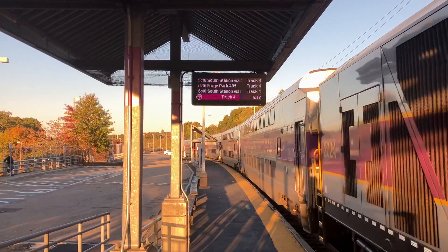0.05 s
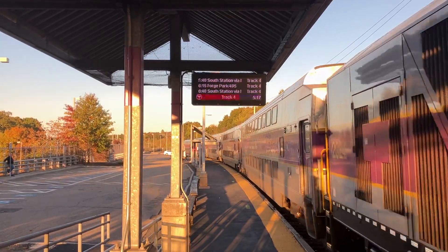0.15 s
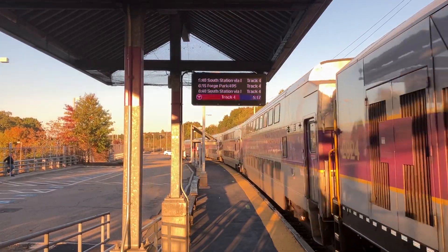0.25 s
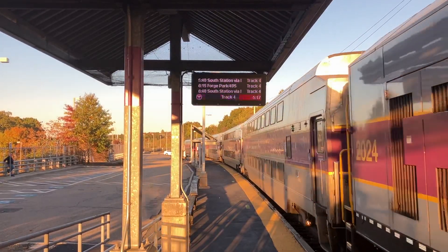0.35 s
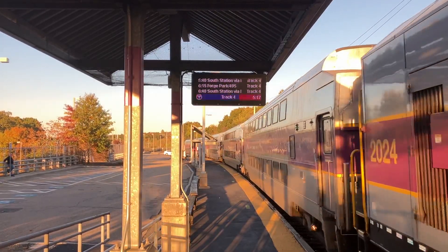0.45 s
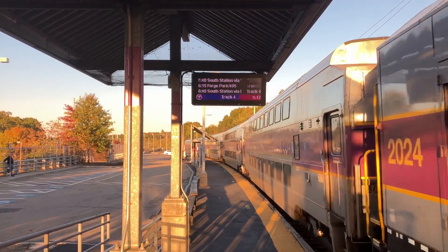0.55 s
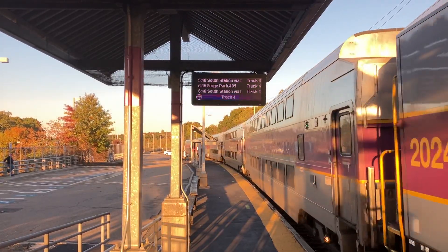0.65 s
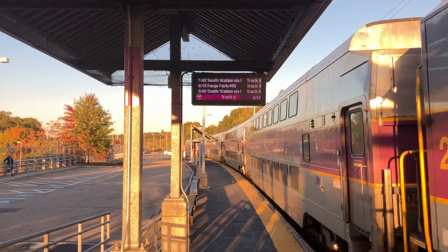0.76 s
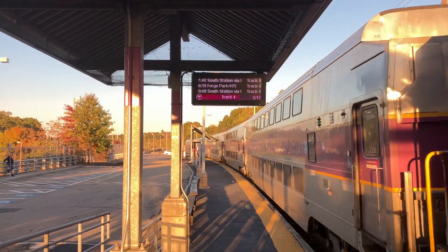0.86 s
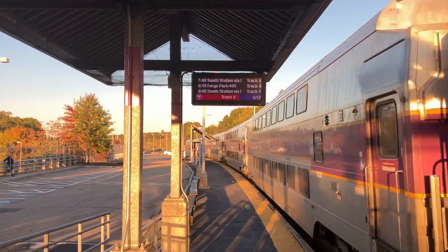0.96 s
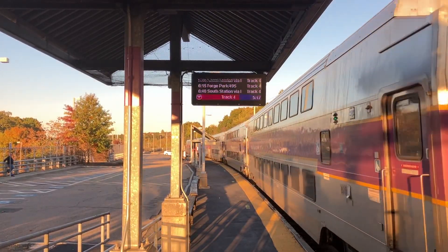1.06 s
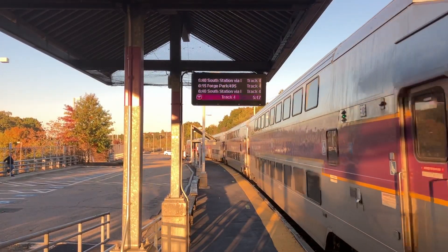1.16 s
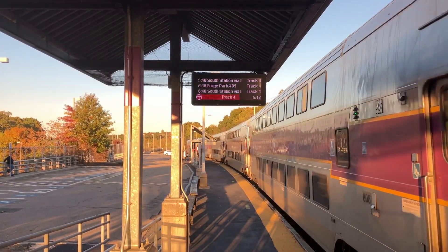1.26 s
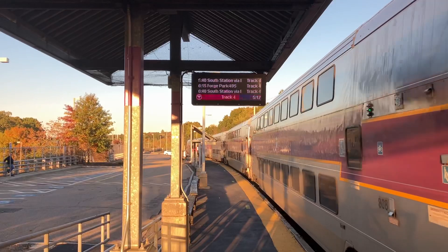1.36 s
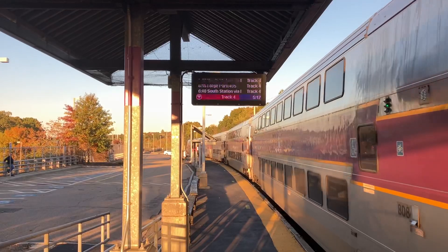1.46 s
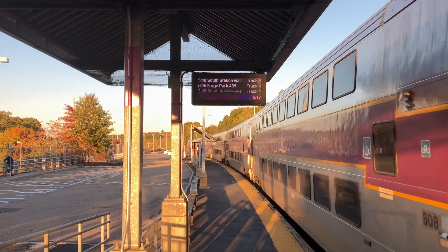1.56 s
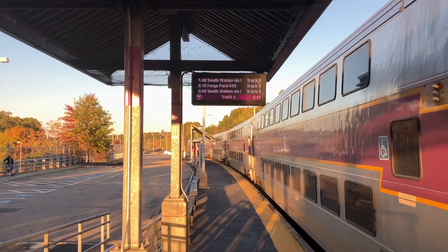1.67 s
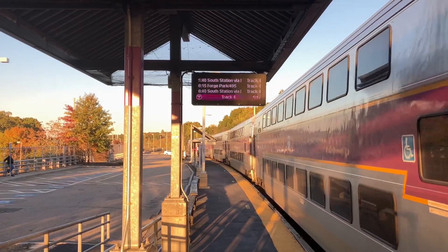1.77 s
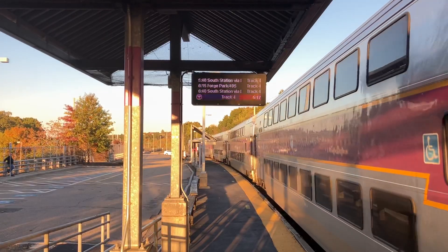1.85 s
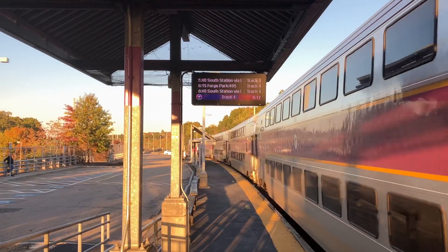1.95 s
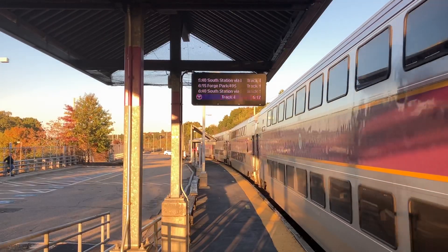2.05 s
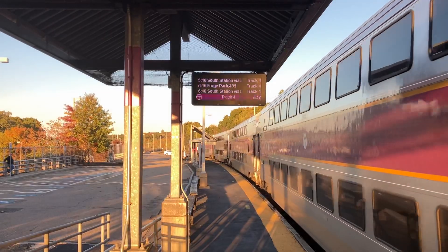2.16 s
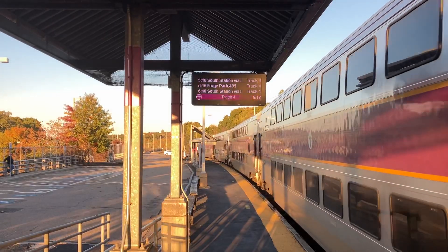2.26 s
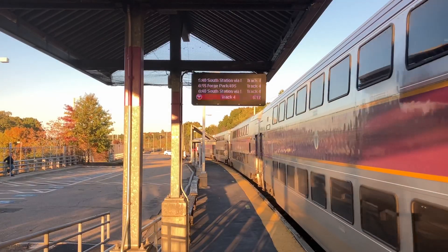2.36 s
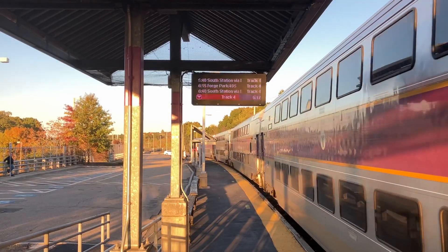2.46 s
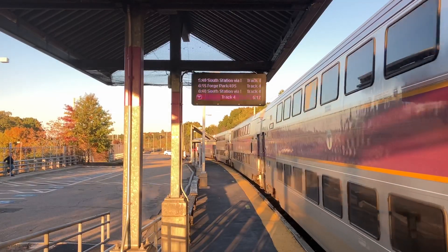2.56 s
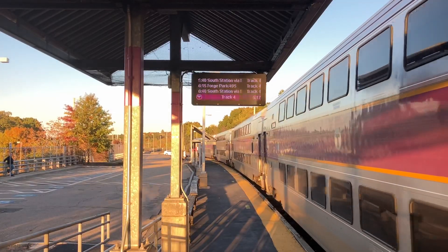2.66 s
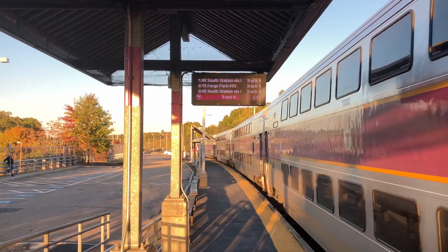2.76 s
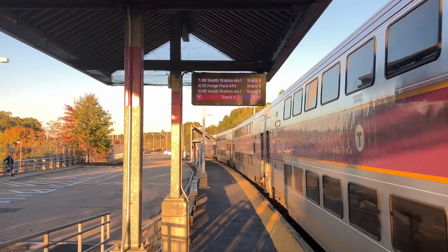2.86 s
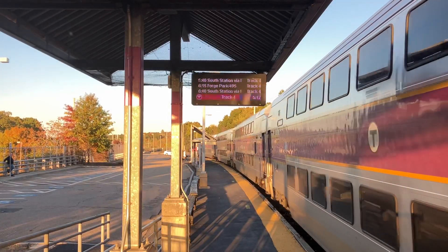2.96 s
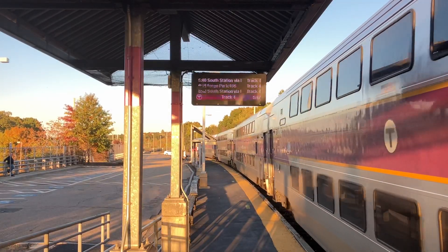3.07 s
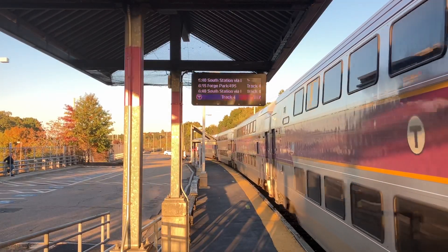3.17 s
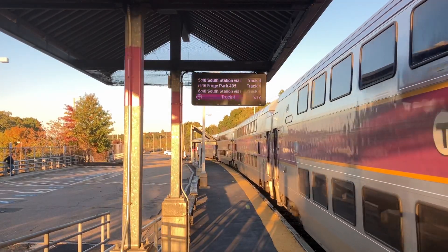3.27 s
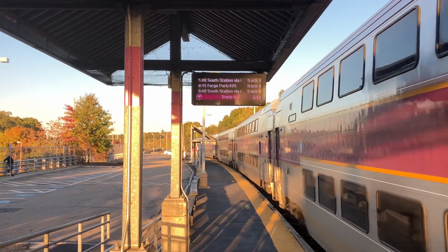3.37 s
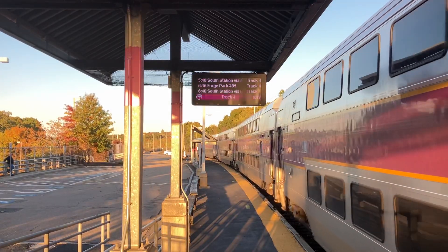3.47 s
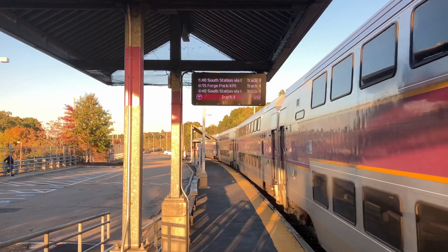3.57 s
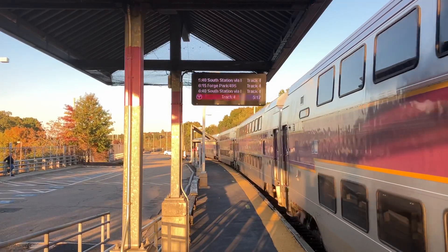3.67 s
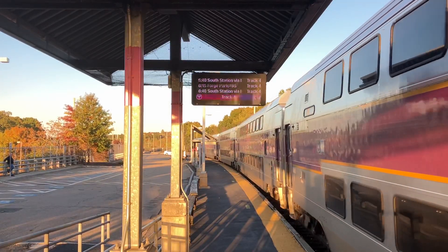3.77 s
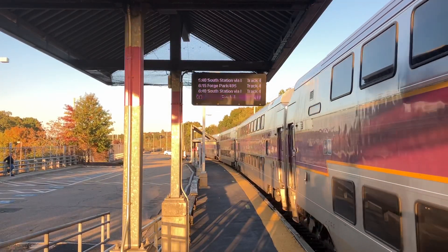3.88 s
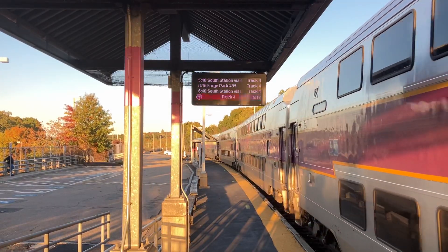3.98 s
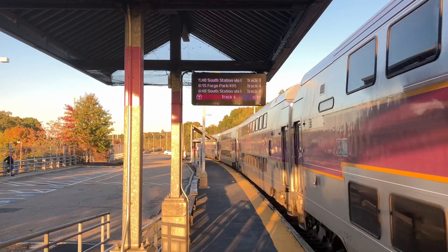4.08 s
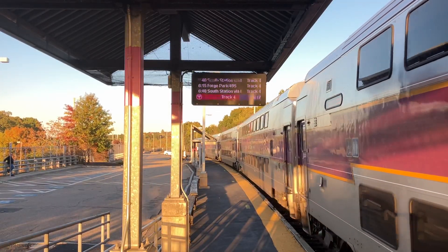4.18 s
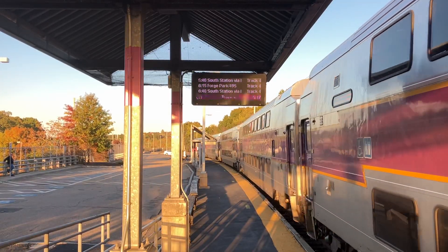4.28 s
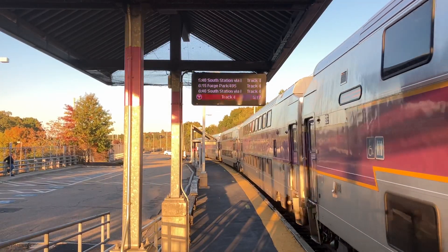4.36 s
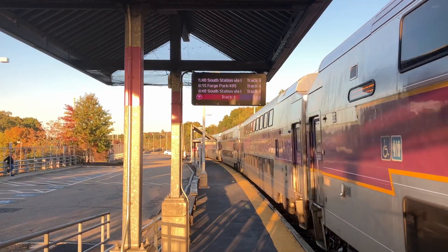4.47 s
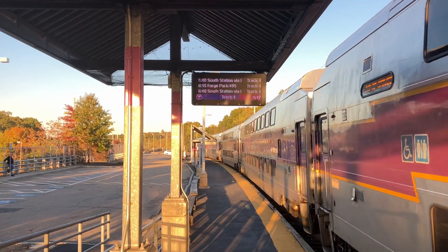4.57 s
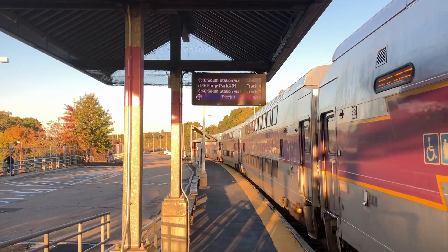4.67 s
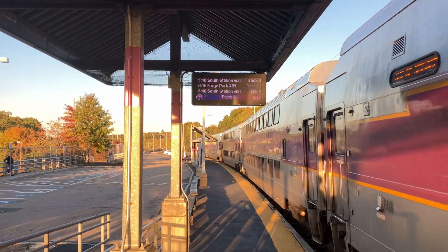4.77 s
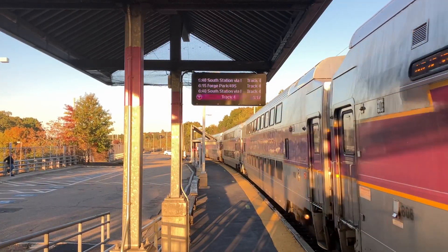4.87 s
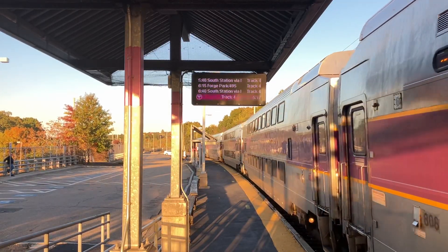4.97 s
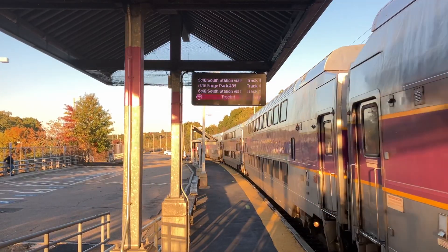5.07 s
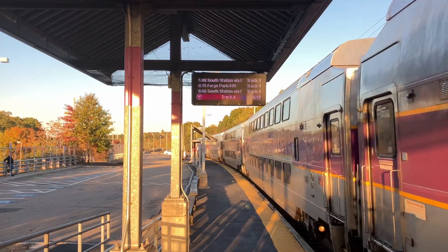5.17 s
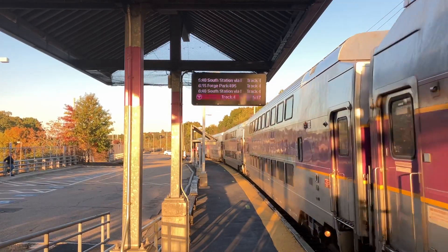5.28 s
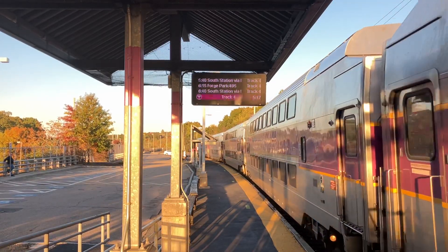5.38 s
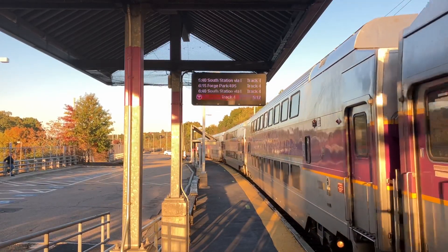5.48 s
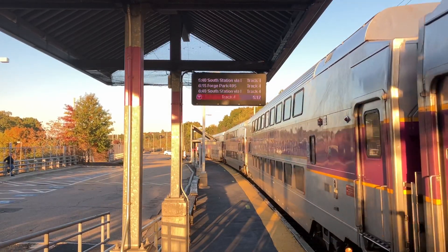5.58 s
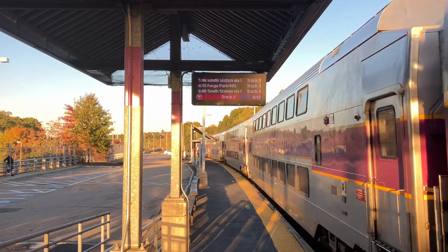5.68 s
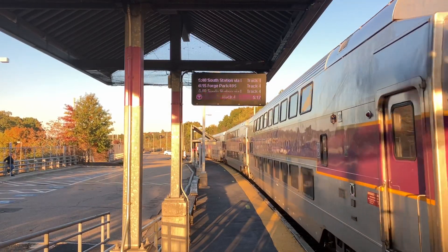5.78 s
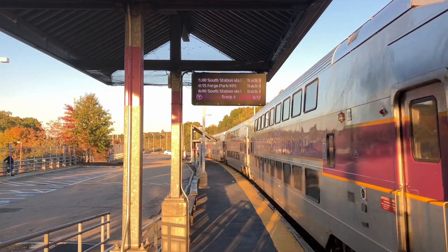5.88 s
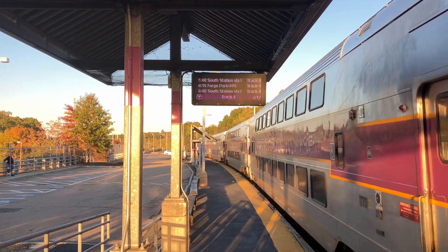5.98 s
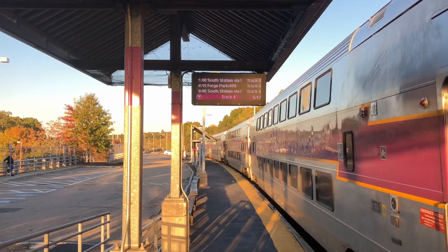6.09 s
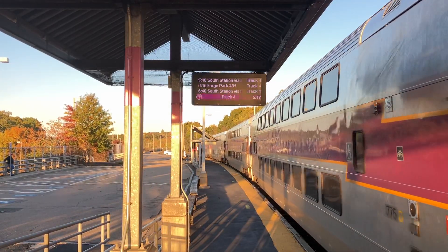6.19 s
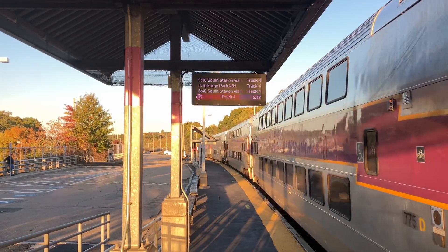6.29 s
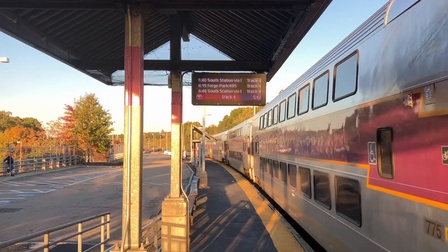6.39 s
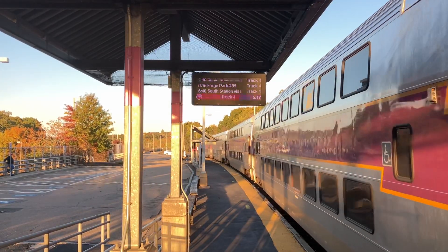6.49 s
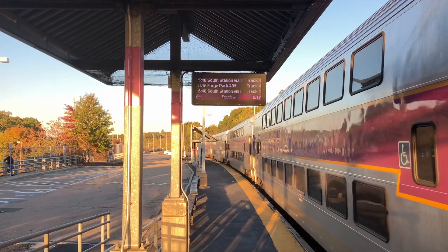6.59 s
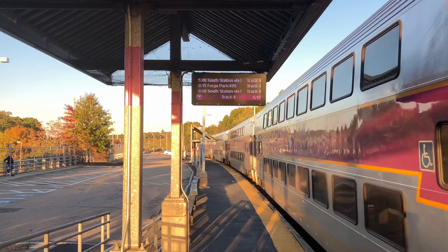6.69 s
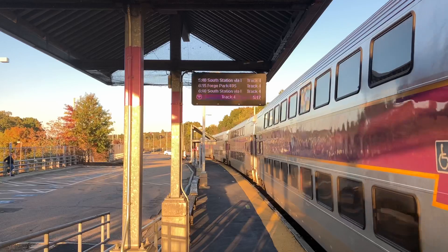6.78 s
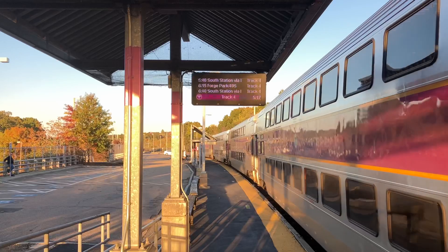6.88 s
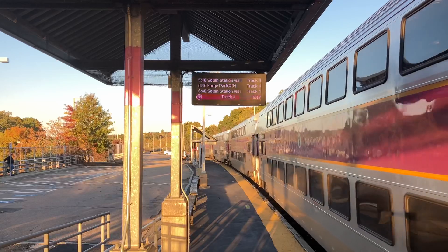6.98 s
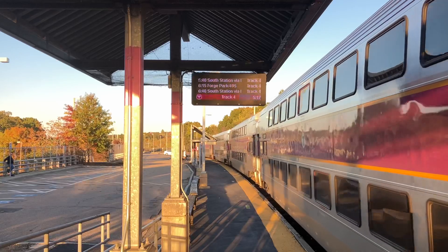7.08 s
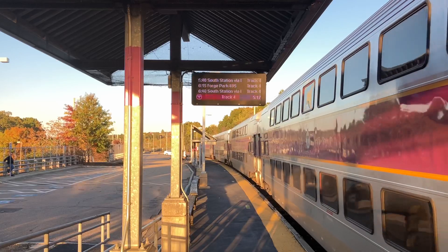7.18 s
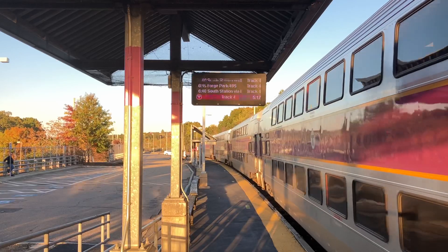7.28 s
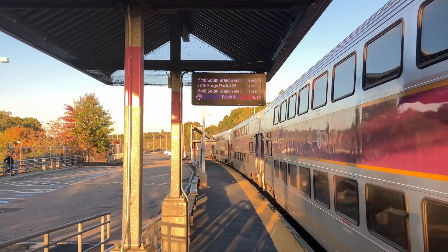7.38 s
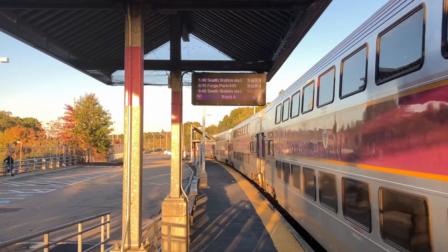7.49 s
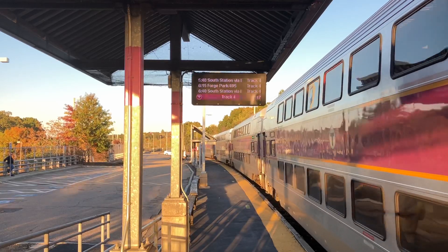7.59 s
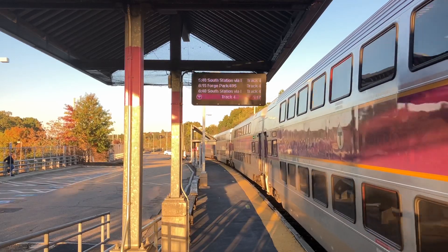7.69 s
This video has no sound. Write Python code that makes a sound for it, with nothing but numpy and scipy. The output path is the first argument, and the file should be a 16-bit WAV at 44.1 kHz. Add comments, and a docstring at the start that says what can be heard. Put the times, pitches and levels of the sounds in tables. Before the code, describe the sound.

Outdoors under a station canopy, a diesel locomotive passes very close on the right: deep beating exhaust, roaring fans, rapid ticking air spits and jingling metal. It fades within about two seconds as the throttle eases. Coaches follow slowly with low rumble, wheel hiss, faint chirps and short metallic rings. Air leaks thinly, puffs once late, and brakes begin to sing at the end. Fixed stereo microphones on the platform.

```python
"""Station platform, two microphones: a diesel locomotive passes close on the right and draws away. Beating
crank orders make its exhaust throb; blurred blade-pass tones are its fans, pulsed noise its spitting valve.
Coaches roll slowly after it: coloured noise rumbles and hisses, frayed notes are flanges chirping on the
curved rail and brakes ringing, and compressed air leaks and lets off one short puff."""
import sys
import numpy as np
from scipy import signal
from scipy.fft import rfft, irfft
from scipy.io import wavfile
from scipy.ndimage import uniform_filter1d, minimum_filter1d

SR = 44100
rng = np.random.default_rng(int(sys.argv[2]) if len(sys.argv) > 2 else 0)


def store_pcm(level_fs):
    """Save levels as 16-bit WAV."""
    pcm = np.round(np.clip(level_fs, -1, 1) * 32767).astype(np.int16)
    wavfile.write(sys.argv[1], SR, np.atleast_2d(pcm).T)


N = 341334
TIME = np.arange(N) / SR
BINS = np.fft.rfftfreq(N, 1 / SR)
SPEED_M_PER_S, SOUND_M_PER_S = 5, 343
BOOM_ORDER, BEAT_ORDER = 12, 15  # multiples of the crank rate
# one easing of the throttle: crank turns a second before and after, and when the drop starts and ends
CRANK_HZ, THROTTLE_BACK_S = (5.092, 4.758), (2.268, 4.577)

# exhaust's two strong orders, before trims: time_s, boom_level_db, beat_level_db
EXHAUST_LEVELS = [(0.05, -9, -10), (0.33, -8.5, -12), (0.39, -12, -15.5), (0.57, -14, -15),
                  (0.7, -9.5, -16), (0.87, -8.5, -40), (0.92, -9.5, -26), (0.97, -15.5, -21),
                  (1.23, -24, -23), (1.4, -13, -22), (1.8, -12, -29.5), (2.26, -19, -19),
                  (2.84, -20.5, -29.5), (3.24, -34, -21.5), (3.3, -31, -29), (3.9, -33, -28),
                  (4.55, -36.5, -39), (4.61, -32.5, -28), (5.64, -29, -32), (7.26, -44, -30.5),
                  (7.62, -24, -32)]
# uneven cylinders, relative to the growl: crank_multiple, level_db
GROWL_ORDERS = [(6, -20), (9, -25), (11, 4.5), (13, -3), (14, -8.5), (16, -2.5), (17, -9), (18, -7.5),
                (19, -1.5), (20, -14), (21, -10.5), (22, -8.5), (23, -10.5), (28, -12.5)]
GROWL_LOADED_DB, GROWL_IDLE_DB = -28, -41.5
GROWL_SWELL_S, GROWL_SWELL_HALF_S, GROWL_SWELL_DB = 6.3, 0.79, 5


def exhaust(waver=0.61, lag_s=0.00047, boom_db=1.5, beat_db=1.0):
    """Two crank orders beat into a throb; uneven cylinders add a growl that eases with the throttle."""
    turns = crank_turns()
    boom = np.cos(2 * np.pi * BOOM_ORDER * turns) * gain_of(curve(EXHAUST_LEVELS) + boom_db)
    beat = np.cos(2 * np.pi * BEAT_ORDER * turns) * gain_of(curve(EXHAUST_LEVELS, column=2) + beat_db)
    pipe = boom + beat
    growl = gain_of(np.interp(TIME, THROTTLE_BACK_S, (GROWL_LOADED_DB, GROWL_IDLE_DB)))
    # the growl swells once more, late
    swell = np.exp(-((TIME - GROWL_SWELL_S) / GROWL_SWELL_HALF_S) ** 2)
    growl = growl * gain_of(GROWL_SWELL_DB * swell)
    for order, db in GROWL_ORDERS:
        firing = np.exp(2j * np.pi * (order * turns + rng.random()))
        unsteady = np.exp(1j * waver * wander(1.9).real)
        pipe += gain_of(db) * growl * (firing * unsteady).real
    left = np.interp(TIME - lag_s, TIME, pipe) * gain_of(-2.5)
    right = pipe * gain_of(-2.23)
    return np.sqrt(2) * np.array([left, right])


def crank_turns():
    """Angle of the crankshaft, in turns."""
    return np.cumsum(np.interp(TIME, THROTTLE_BACK_S, CRANK_HZ)) / SR - .032


# likeness of the two microphones for locomotive noise: pitch_hz, likeness (0-1)
LOCO_LIKENESS = [(50, 0.92), (130, 0.95), (260, 1), (550, 0.89), (1100, 0.3), (2500, 0.47), (6000, 0.13),
                 (12000, 1)]
# noise colours, shape only: pitch_hz, level_db (per Hz)
ROAR_COLOUR = [(18, -12), (40, -7.5), (75, 9), (120, -0.5), (190, 1), (270, -6.5), (350, -4.5), (500, -6.5),
               (680, -0.5), (850, -11), (1200, -25), (2500, -55.5)]
MACHINERY_COLOUR = [(500, -1.5), (1000, -2.5), (1400, -2), (1800, -4), (2150, -18), (3000, -50),
                    (6000, -68)]
TREBLE_COLOUR = [(1200, -1), (2200, 5.5), (2900, 1.5), (3600, -2), (5000, -2), (7500, -9.5), (11000, -53),
                 (16000, -48)]
GRILLE_COLOUR = [(200, -29), (330, -1.5), (480, 4.5), (600, -1), (740, -0.5), (950, -21), (2000, -37),
                 (5000, -52)]


def locomotive(chuff=0.31):
    """Roar pulsing with the firing, a rush from the side grilles, and machinery hiss loudest side-on."""
    firing = np.cos(2 * np.pi * BOOM_ORDER * crank_turns())
    roar = noise(ROAR_COLOUR, LOCO_LIKENESS, lag_ms=0.46) * (1 + chuff * firing)
    roar *= passing(abreast_s=0.58, gap_m=3, db=-16, fall_db=30)
    whirr = noise(MACHINERY_COLOUR, LOCO_LIKENESS, lag_ms=0.36)
    whirr *= passing(abreast_s=0.5043, gap_m=3, db=-23.5, fall_db=31.5)
    treble = noise(TREBLE_COLOUR, LOCO_LIKENESS, lag_ms=0.264) * treble_passing()
    treble *= gain_of(1.7 * wander(15).real)
    grilles = noise(GRILLE_COLOUR, LOCO_LIKENESS, lag_ms=0.15)
    grilles *= passing(abreast_s=0.45, gap_m=0.7, db=-21.5, fall_db=55)
    return roar + bounced(grilles + whirr, abreast_s=.75, gap_m=3.2, delay_ms=7.5, strength=.5) + treble


def treble_passing():
    """Gain of the locomotive's treble sources as they roll by."""
    return passing(abreast_s=.5, gap_m=3.5, db=-31, fall_db=34)


def bounced(x, abreast_s, gap_m, delay_ms, strength):
    """Adds the platform's reflection; its delay is longest when abreast, so a comb sweeps the noise."""
    distance = np.hypot(gap_m, SPEED_M_PER_S * (TIME - abreast_s))
    delay_s = delay_ms / 1000 * gap_m / distance
    echo = np.array([np.interp(TIME - delay_s, TIME, side) for side in x])
    return (x + strength * echo) / np.hypot(1, strength)


# fans' lowest partial: time_s, level_db
DRONE_LEVELS = [(0, -17.5), (.12, -24), (.25, -25.5), (.45, -23), (.63, -20.5), (.9, -15.5), (1.02, -34),
                (1.2, -27.5), (1.33, -25.5), (1.5, -27), (1.68, -38), (2.0, -32), (2.25, -31), (2.5, -38.5),
                (3.4, -45)]
# second partial: time_s, level_db
SECOND_LEVELS = [(0, -40), (.1, -26.5), (.23, -21), (.3, -33), (.55, -30), (.7, -27.5), (.88, -26),
                 (.95, -45), (1.11, -29), (1.17, -43), (1.24, -22), (1.29, -44), (1.38, -27.5), (1.55, -47),
                 (2.0, -38.5), (2.28, -37.5), (2.45, -46), (4.4, -43), (5.6, -47.5), (7.7, -47)]
# third partial, coming in pulses, before its trim: time_s, level_db
THIRD_LEVELS = [(0.0, -41), (0.03, -36), (0.17, -18.5), (0.24, -22), (0.26, -41), (0.3, -26.5),
                (0.64, -25.5), (0.74, -35), (0.96, -26.5), (1.24, -25.5), (1.31, -38), (1.4, -23.5),
                (1.5, -34.5), (1.55, -26), (1.6, -49), (1.69, -22.5), (1.85, -39.5), (2.59, -41),
                (2.63, -63), (2.71, -43), (2.92, -49), (3.6, -46), (5.3, -54.5), (6.8, -48.5)]
# weaker partials, relative to one another: blade_multiple, level_db, width_hz
WEAK_PARTIALS = [(4, -16, 56), (5, -22, 34), (7, -28.5, 35)]
BLADE_HZ, FAN_ABREAST_S, FAN_GAP_M = 201.7, 0.5, 5
# the first coach screens the roof fans
SCREENED_S, SCREENED_OVERTONE_DB, DRONE_GONE_S = 2, -0.5, 4.03


def fans(waver=0.00415, third_db=-1):
    """Blade-pass tones of the cooling fans, blurred by turbulence and sinking in pitch as they pass."""
    hz = BLADE_HZ * doppler(FAN_ABREAST_S, FAN_GAP_M) * (1 + waver * wander(4.08).real)
    drone = tone(hz, 9, clean=.95, lag_ms=0.18, spread=0.2) * gain_of(curve(DRONE_LEVELS))
    drone *= eased(0.98, 0, DRONE_GONE_S, span_s=0.2)
    second = tone(2 * hz, 21, clean=0.856, lag_ms=0.22, spread=0.24) * gain_of(curve(SECOND_LEVELS))
    third = tone(3 * hz, 26, clean=0.94, lag_ms=0.06, spread=0.15)
    third *= gain_of(curve(THIRD_LEVELS) + third_db)
    weak = np.zeros((2, N))
    for multiple, db, width_hz in WEAK_PARTIALS:
        weak += gain_of(db) * tone(multiple * hz, width_hz, clean=0.92, lag_ms=0.14, spread=0.16)
    weak *= passing(FAN_ABREAST_S, FAN_GAP_M, db=-23.5, fall_db=34)
    screened = gain_of(eased(0, SCREENED_OVERTONE_DB, SCREENED_S, span_s=1.0))
    return drone + second + third + weak * screened


def clatter(db=3, t60_s=0.14, low_hz=1600, high_hz=4000, count=420):
    """Loose truck fittings jingle: small metal rings at random over 3 s, fading with the machinery."""
    t = np.arange(SR // 5) / SR
    envelope = (1 - np.exp(-t / .004)) * gain_of(-60 * t / t60_s)
    out = np.zeros((2, N + len(t)))
    for when, pitch, size, side, turn in rng.random((count, 5)):
        hz = low_hz * (high_hz / low_hz) ** pitch
        ping = np.sin(2 * np.pi * (hz * t + np.array([[turn], [0]]))) * envelope
        at = int(when * 3 * SR)
        out[:, at:at + len(t)] += size ** 2 * np.sqrt([[side], [1 - side]]) * ping
    return out[:, :N] * gain_of(db) * treble_passing()


# colour of air through a small gap, for spits and leaks, shape only: pitch_hz, level_db (per Hz)
AIR_COLOUR = [(2000, -25), (5000, -12), (8500, -5), (11500, 0), (15500, 0)]
# the valve drops out of sight behind the locomotive's end
VALVE_HIDDEN_S, VALVE_HIDDEN_DB = 1.32, -13.5


def spitter(decay_s=0.05, rest=0.2):
    """An air valve snaps open about thirteen times a second; each spit fades until the next."""
    age = (TIME - .052) % .077
    sharp = eased(1, .25, VALVE_HIDDEN_S, span_s=0.2)  # once hidden, echoes smear the spits
    pulses = evened(rest + np.exp(-age / decay_s))
    spits = (1 - sharp + sharp * pulses) * gain_of(0.94 * wander(90).real)
    hidden = gain_of(eased(0, VALVE_HIDDEN_DB, VALVE_HIDDEN_S, span_s=0.19))
    hiss = noise(AIR_COLOUR, LOCO_LIKENESS, lag_ms=0.1765)
    return hiss * spits * passing(abreast_s=0, gap_m=5, db=-39, fall_db=24.5) * hidden


# wheel modes, relative to one another: pitch_hz, level_db, width_hz
WHEEL_PARTIALS = [(1720, -9, 90), (2690, -3.5, 35), (2787, -3, 57), (3035, -6.5, 60), (3170, -10.5, 60),
                  (3310, -6, 38), (4090, -12.5, 80), (4450, -7, 54)]
# grinding of the locomotive's rear truck, shape only: pitch_hz, level_db (per Hz)
GRIND_COLOUR = [(1800, -23), (2450, 2.5), (3100, -1), (3700, -4), (4400, -16), (7000, -27)]
NOTE_WAVER_HZ = 22  # pitch waver of rubbed and ringing notes


def ringing(patchy_db=5.0):
    """Rough rail and brake shoes keep wheel modes ringing on and off; the rear truck grinds past."""
    modes = np.zeros((2, N))
    for hz, db, width_hz in WHEEL_PARTIALS:
        pitch_hz = hz + NOTE_WAVER_HZ * wander(3).real
        mode = tone(pitch_hz, width_hz, clean=0.08, lag_ms=0.064, spread=1.0)
        modes += gain_of(db) * mode * evened(gain_of(patchy_db * wander(5.8).real))
    modes *= passing(abreast_s=.55, gap_m=2.0, db=-39, fall_db=24)
    grind = noise(GRIND_COLOUR, LOCO_LIKENESS, lag_ms=0.06) * evened(gain_of(3 * wander(40).real))
    return modes + grind * passing(abreast_s=.66, gap_m=.9, db=-32, fall_db=45)


# likeness of the two microphones for coach noise: pitch_hz, likeness (0-1)
COACH_LIKENESS = [(50, 0.79), (130, 0.71), (260, 0.96), (550, 0.57), (1100, 0.19), (2500, 0.27),
                  (6000, 0.079), (12000, 0.17)]
# noise colours, shape only: pitch_hz, level_db (per Hz)
RUMBLE_COLOUR = [(18, -2), (40, 3), (80, 9.5), (125, 1.5), (180, 2.5), (260, -1), (370, -1.5), (480, -5.5),
                 (700, -5), (900, -16), (1400, -20), (3000, -60)]
WHEEL_HISS_COLOUR = [(500, -24), (1000, -5), (1550, 4.5), (2050, 1.5), (2600, 1), (3500, -5.5), (4600, -6),
                     (6000, -14.5), (8000, -31), (16000, -53)]
BOOM_COLOUR = [(70, -25), (125, 0), (175, 0), (230, -14.5), (400, -12), (700, -31), (1500, -58)]
# ventilation hum, relative to one another: pitch_hz, level_db, width_hz
HUM_PARTIALS = [(181, -1, 5), (356, -13.5, 6), (535, -10, 7.3)]
# coach ventilators going by: abreast_s, gap_m, level_db (when abreast)
VENTILATOR_PASSES = [(4.8, 1.43, -39), (6.45, 2.4, -39), (7.68, 2, -41)]
RUMBLE_DB, RUMBLE_DB_PER_S = -43.5, 1.82
HISS_EARLY_DB, HISS_LATE_DB, HISS_SETTLES_S = -45.5, -51.5, 3.7
WHINE_FAST_HZ, WHINE_SLOW_HZ, SLOWING_MID_S = 394, 355, 5.2
WHINE_DB, WHINE_ARRIVES_S = -41.5, 4.0


def coaches():
    """Wheels rumble and hiss on the rail, trucks boom by, ventilation hums and the running gear whines."""
    rumble_db = RUMBLE_DB + RUMBLE_DB_PER_S * TIME + 1.65 * wander(11).real
    rumble = noise(RUMBLE_COLOUR, COACH_LIKENESS, lag_ms=0.1) * gain_of(rumble_db)
    hiss_db = eased(HISS_EARLY_DB, HISS_LATE_DB, HISS_SETTLES_S, span_s=0.98) + 1.1 * wander(10).real
    hiss = noise(WHEEL_HISS_COLOUR, COACH_LIKENESS, lag_ms=-0.021) * gain_of(hiss_db)
    hum = np.zeros((2, N))
    for hz, db, width_hz in HUM_PARTIALS:
        pitch_hz = hz * (1 + 0.01176 * wander(1.48).real)
        hum += gain_of(db) * tone(pitch_hz, width_hz, clean=0.68, lag_ms=0.15, spread=0.11)
    hum *= sum(passing(*row, fall_db=45.0) for row in VENTILATOR_PASSES)
    # the running gear whines lower as the train slows
    whine_hz = eased(WHINE_FAST_HZ, WHINE_SLOW_HZ, SLOWING_MID_S, span_s=.3)
    whine = tone(whine_hz, width_hz=10, clean=.88, lag_ms=0.3, spread=0.24)
    whine *= eased(0, gain_of(WHINE_DB), WHINE_ARRIVES_S, span_s=0.36)
    boom = noise(BOOM_COLOUR, COACH_LIKENESS, lag_ms=0.1)
    boom *= passing(abreast_s=6.6, gap_m=1.5, db=-32.5, fall_db=48)
    return rumble + boom + hiss + hum + whine


# flange chirps, levels before swell and echoes: start_s, length_s, pitch_hz, glide_hz, level_db, width_hz
FLANGE_CHIRPS = [(1.365, 0.037, 4890, 147, -38.5, 700), (1.46, .04, 5230, 0, -43, 900),
                 (2.505, 0.042, 7900, 0, -59, 100), (3.178, 0.075, 7880, 58, -59, 160),
                 (3.435, .07, 7820, 0, -63, 140), (3.679, 0.045, 7940, 59, -51, 120),
                 (3.896, .09, 5840, 130, -62, 90), (4.106, 0.084, 5690, 106, -52, 130),
                 (4.368, 0.073, 5790, -170, -52, 100), (4.47, 0.056, 5930, -92, -55, 80),
                 (4.581, .085, 5530, -130, -47.5, 110), (4.591, 0.047, 10980, -200, -55, 250),
                 (4.66, 0.1, 5760, 280, -56.5, 100), (4.81, .3, 7120, -200, -60, 350),
                 (5.1, .45, 7050, 0, -68, 160), (4.89, 0.16, 5720, 140, -54.5, 100),
                 (5.05, 0.14, 5570, -260, -51.5, 100), (5.135, 0.045, 9350, -250, -59, 220),
                 (5.19, .14, 5620, 158, -50.5, 110), (5.27, 0.036, 9600, 0, -61, 180),
                 (5.481, 0.077, 5570, 70, -53.5, 120)]


def flanges():
    """Flanges rub the curved rail in short, frayed chirps that rise, fall or hold."""
    out = np.zeros((2, N))
    for row in FLANGE_CHIRPS:
        add(out, *sing(*row, attack_s=.012, release_s=.027, spread=2))
    return out


# wheels and shoes ringing, levels before swell and echoes: start_s, length_s, pitch_hz, level_db, width_hz
SHOE_RINGS = [(.11, 0.047, 2830, -34, 35), (0.093, .08, 3380, -41, 40), (.18, 0.11, 4520, -44, 16),
              (.315, .04, 2810, -35.5, 35), (0.39, 0.056, 1800, -37, 130), (.6, 0.046, 3160, -45, 50),
              (0.695, 0.04, 3330, -44, 40), (0.889, 0.035, 2720, -33, 25), (1.005, .175, 2713, -36, 3),
              (1.28, .04, 2690, -43, 20), (1.5, .13, 1715, -44, 80), (1.575, .04, 4070, -52, 50),
              (2.19, .17, 1706, -43.5, 55), (2.37, .14, 1700, -50, 70), (2.2, .1, 2840, -52, 70),
              (2.26, .1, 4110, -60, 90), (2.88, .17, 1715, -50, 80), (2.88, .2, 2770, -52, 130),
              (3.26, .17, 3300, -57, 150), (3.38, .08, 2400, -56, 70), (4.296, 0.05, 2600, -46.5, 41),
              (4.33, 0.045, 3530, -50, 50), (4.385, 0.05, 3530, -48.5, 60), (4.392, .06, 2590, -56, 60),
              (4.385, .035, 4095, -55, 80), (4.62, .17, 1480, -54, 160), (4.815, 0.04, 3515, -46, 70),
              (4.82, .08, 2530, -55.5, 160), (4.86, .08, 3545, -52, 110), (5.06, .11, 3535, -54, 60),
              (5.445, .05, 3510, -60, 70), (5.82, 0.19, 3275, -57.5, 50), (5.87, .04, 4640, -62, 100)]
# brake song, levels before echoes: note_multiple, level_db, width_hz
SONG_PARTIALS = [(1, -58, 80), (2, -57.5, 70), (3, -55, 110)]
BRAKES_ON_S, BRAKES_SWELL_S = 7.48, .11
BRAKE_LOW_HZ, BRAKE_HIGH_HZ = 2425, 2467  # the note creeps up as the shoes bite


def brakes():
    """Wheels and shoes catch and ring briefly; at the end they begin to sing an uneven, rising note."""
    note_hz = eased(BRAKE_LOW_HZ, BRAKE_HIGH_HZ, BRAKES_ON_S, BRAKES_SWELL_S) + 8 * wander(20).real
    song = np.zeros((2, N))
    for multiple, db, width_hz in SONG_PARTIALS:
        song += gain_of(db) * tone(multiple * note_hz, width_hz, clean=0.56, lag_ms=0.02, spread=.3)
    out = song * eased(0, 0.99, BRAKES_ON_S, BRAKES_SWELL_S)
    for start_s, length_s, hz, db, width_hz in SHOE_RINGS:
        add(out, *sing(start_s, length_s, hz, 0, db, width_hz, attack_s=.008, release_s=.035, spread=.8))
    return out


def sing(start_s, length_s, hz, glide_hz, db, width_hz, attack_s, release_s, spread):
    """One stick-slip note that swells, glides, wavers and frays; returns its start and its sound."""
    t = np.arange(2 ** 15) / SR
    shared = rng.standard_normal((2, 1, len(t)))
    apart = rng.standard_normal((2, 2, len(t)))  # unlike at the two microphones
    a, b = shared + spread * apart
    narrowing = 1 + (np.fft.fftfreq(len(t), 1 / SR) / (.6 * width_hz)) ** 2
    blur = np.fft.ifft((a + 1j * b) / narrowing)
    along = np.minimum(t / length_s, 1)
    waver = evened(uniform_filter1d(rng.standard_normal(len(t)), size=SR // 35))
    pitch_hz = hz + glide_hz * (along - .5) + min(NOTE_WAVER_HZ, width_hz) * waver
    # the square root evens out the blur's own fading
    note = (blur / np.sqrt(abs(blur)) * np.exp(2j * np.pi * np.cumsum(pitch_hz) / SR)).real
    note = note / note[:, :round(length_s * SR)].std()
    swell = 1 + .4 * (np.sin(np.pi * along) - 2 / np.pi)
    return start_s, gain_of(db) * note * swell * burst(t, length_s, attack_s, release_s)


def roof(x, t60_s=0.63, wet_db=-11):
    """Scattered echoes between the canopy and the side of the train."""
    t = np.arange(SR // 2) / SR
    tail = rng.standard_normal((2, len(t))) * gain_of(-60 * t / t60_s) * (t > .012)
    echoes = signal.fftconvolve(x, tail / np.linalg.norm(tail[0]), axes=1)[:, :N]
    return x + gain_of(wet_db) * echoes


# leaking air lines, level each swells towards: start_s, length_s, level_db
AIR_LEAKS = [(3.7, 4, -66.5), (3.71, 0.89, -55), (4.154, 0.25, -52.5), (4.855, .4, -54.5),
             (5.808, 0.094, -55), (6.0, 0.065, -52), (6.318, 1.5, -57), (6.6, 1.2, -52), (7.2, .6, -50)]
# colour of the brake valve's puff, shape only: pitch_hz, level_db (per Hz)
PUFF_COLOUR = [(800, -38), (1800, 3.5), (3500, 4.5), (5000, 3), (7300, 8), (9500, -13), (12000, 1),
               (15500, -39)]
SEEP_DB = -74  # steady leak under the others
PUFF_START_S, PUFF_LENGTH_S, PUFF_DB, PUFF_SWELL_DB_PER_S = 6.497, 0.083, -32.5, 100


def air():
    """Thin hiss of leaking air lines, and one puff from a brake valve that opens ever wider, then shuts."""
    power = gain_of(SEEP_DB) ** 2
    for start_s, length_s, db in AIR_LEAKS:
        power = power + (gain_of(db) * burst(TIME - start_s, length_s, attack_s=0.12, release_s=0.1)) ** 2
    leak = noise(AIR_COLOUR, COACH_LIKENESS, lag_ms=0.025) * np.sqrt(power)
    leak *= gain_of(1.3 * wander(25).real)
    age = TIME - PUFF_START_S
    valve = burst(age, PUFF_LENGTH_S, attack_s=.008, release_s=.018)
    opening_db = PUFF_SWELL_DB_PER_S * np.clip(age - PUFF_LENGTH_S, -PUFF_LENGTH_S, 0)
    sputter_db = 2.8 * wander(90).real
    puff = noise(PUFF_COLOUR, COACH_LIKENESS, lag_ms=0.17) * valve
    puff *= gain_of(PUFF_DB + opening_db + sputter_db)
    return leak + roof(puff, t60_s=0.35, wet_db=-11.5)


def passing(abreast_s, gap_m, db, fall_db):
    """Gain of a source rolling by: db when abreast, losing fall_db per tenfold distance."""
    distance = np.hypot(gap_m, SPEED_M_PER_S * (TIME - abreast_s))
    return gain_of(db - fall_db * np.log10(distance / abs(gap_m)))


def doppler(abreast_s, gap_m):
    """Pitch factor of a source that rolls by."""
    along_m = SPEED_M_PER_S * (TIME - abreast_s)
    return 1 - SPEED_M_PER_S / SOUND_M_PER_S * along_m / np.hypot(gap_m, along_m)


def noise(spectrum, likeness, lag_ms):
    """Coloured noise at two microphones, partly shared; the left one hears it lag_ms later."""
    a, b = rfft(rng.standard_normal((2, N)))
    same = np.clip(read(likeness), 0, 1)
    left = a * np.exp(-2j * np.pi * BINS * lag_ms / 1000)
    right = same * a + np.sqrt(1 - same ** 2) * b
    return evened(irfft(np.array([left, right]) * gain_of(read(spectrum)), N))


def tone(hz, width_hz, clean, lag_ms, spread):
    """A line on the pitch curve hz: a clean part plus scatter, partly unlike at each microphone."""
    clean = np.clip(clean, 0, 1)
    shared = clean + np.sqrt(1 - clean ** 2) * wander(width_hz / 2)
    apart = spread * wander(width_hz / 2)
    turns = np.cumsum(hz * np.ones(N)) / SR + rng.random()
    late = np.exp(-2j * np.pi * np.mean(hz) * lag_ms / 1000)
    sides = np.array([(shared + apart) * late, shared - apart])
    return evened((sides * np.exp(2j * np.pi * turns)).real)


def wander(rate_hz):
    """Smooth complex chance of rms 1 that changes about rate_hz times a second."""
    hz = np.fft.fftfreq(8192, TIME[-1] / 8192)
    z = rng.standard_normal((2, len(hz)))
    slow = evened(np.fft.ifft((z[0] + 1j * z[1]) / (1 + (hz / rate_hz) ** 2)))
    return np.interp(TIME, np.linspace(0, TIME[-1], len(hz)), slow)


def eased(before, after, mid_s, span_s):
    """A smooth change from one value to another."""
    return before + (after - before) / (1 + np.exp((mid_s - TIME) / span_s))


def burst(age, length_s, attack_s, release_s):
    """Attack, hold and release."""
    attack = 1 - np.exp(-np.maximum(age, 0) / attack_s)
    return attack * np.exp(-np.maximum(age - length_s, 0) / release_s)


def add(mix, start_s, sound):
    """Mixes a sound in at its time."""
    part = mix[:, max(round(start_s * SR), 0):][:, :sound.shape[1]]
    part += sound[:, :part.shape[1]]


def gain_of(db):
    """Decibels to amplitude."""
    return 10 ** (np.asarray(db) / 20)


def evened(x):
    """Scales to rms 1."""
    return x / np.sqrt(np.mean(abs(x) ** 2) + 1e-20)


def curve(rows, column=1):
    """One column of a time table at every sample."""
    rows = np.array(rows, float)
    return np.interp(TIME, rows[:, 0], rows[:, column])


def read(points):
    """A frequency table at every bin, on a log axis."""
    hz, value = np.transpose(points)
    return np.interp(np.log(BINS + 1), np.log(hz + 1), value)


def scene():
    """The whole train, heard from the platform."""
    body = locomotive() * gain_of([[-.5], [.5]])  # leans to the right
    engine = exhaust() + body + fans() + clatter() + spitter()
    return engine + ringing() + coaches() + roof(flanges() + brakes()) + air()


def record(dry):
    """A quick limiter rides the loudest peaks; then a low-pass sets the band limit."""
    needed = np.minimum(.95 / (abs(dry).max(axis=0) + 1e-9), 1)
    gain = uniform_filter1d(minimum_filter1d(needed, size=400), size=400)
    lowpass = signal.firwin(511, 15800, window=("kaiser", 9), fs=SR)  # edge in Hz
    return signal.oaconvolve(dry * gain, lowpass[None], "same")


dry = scene()
out = record(dry)
store_pcm(out)
```